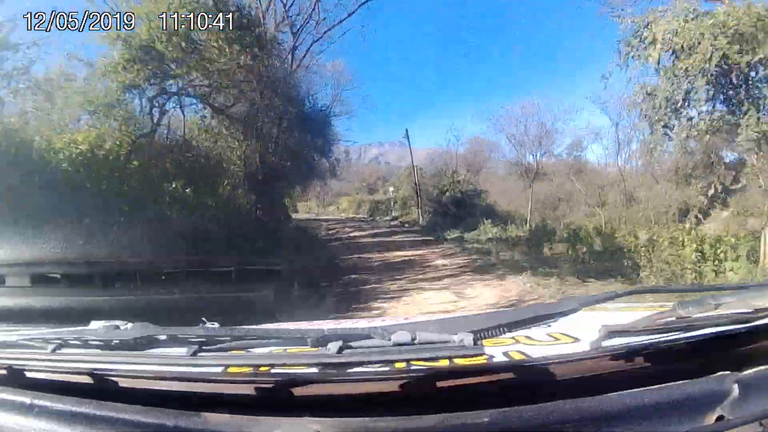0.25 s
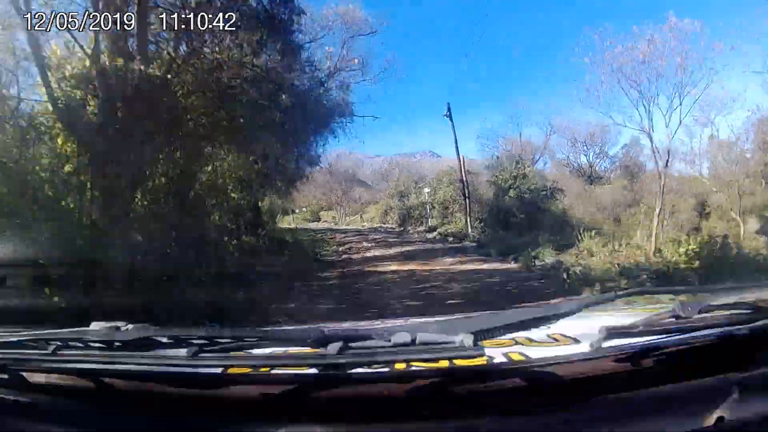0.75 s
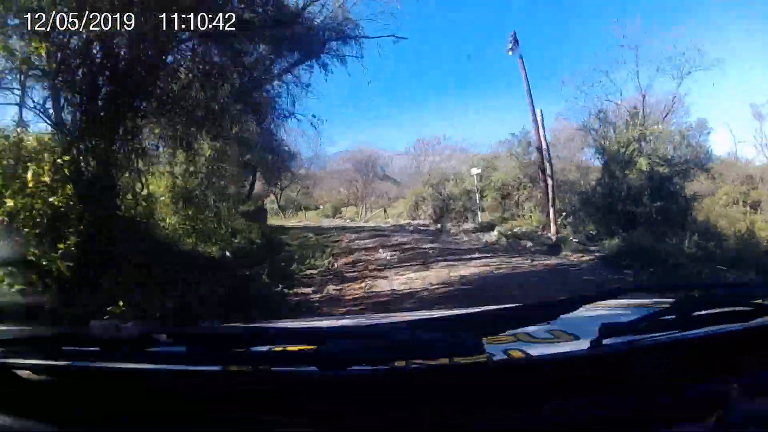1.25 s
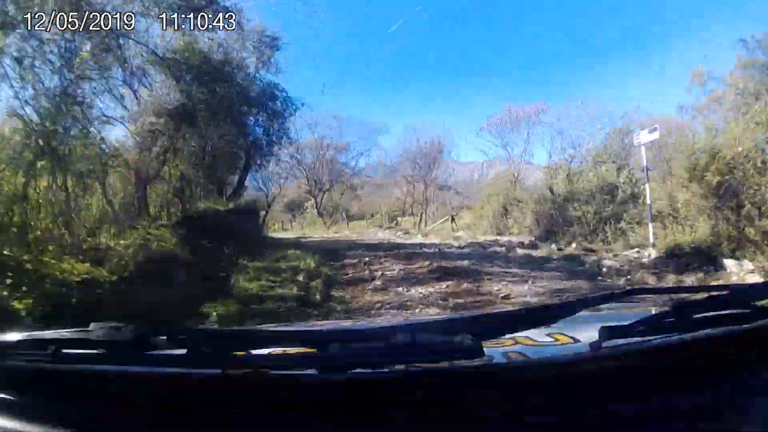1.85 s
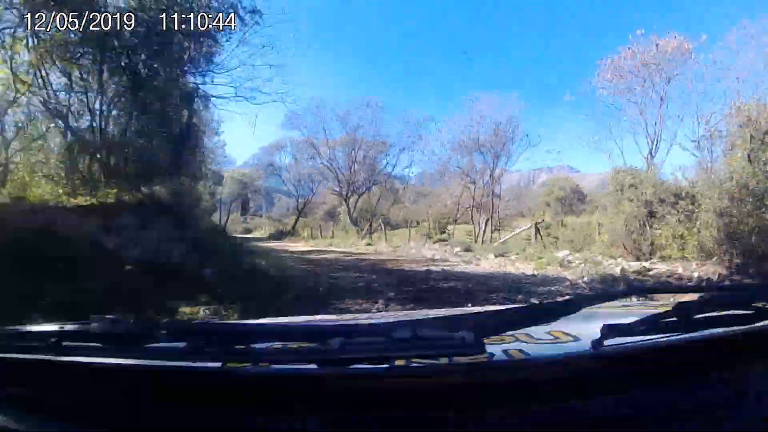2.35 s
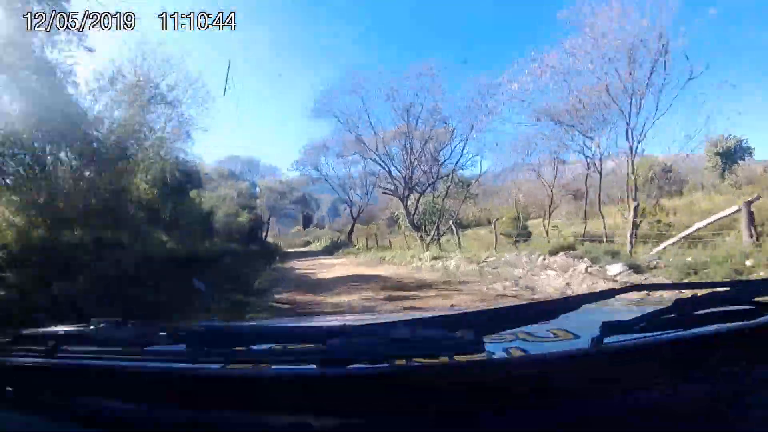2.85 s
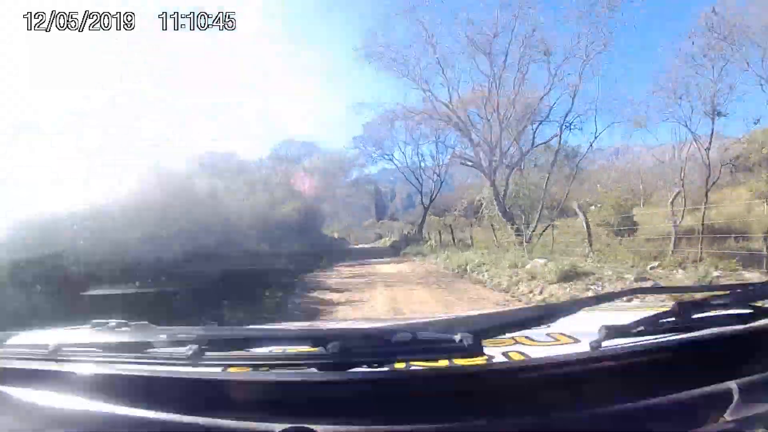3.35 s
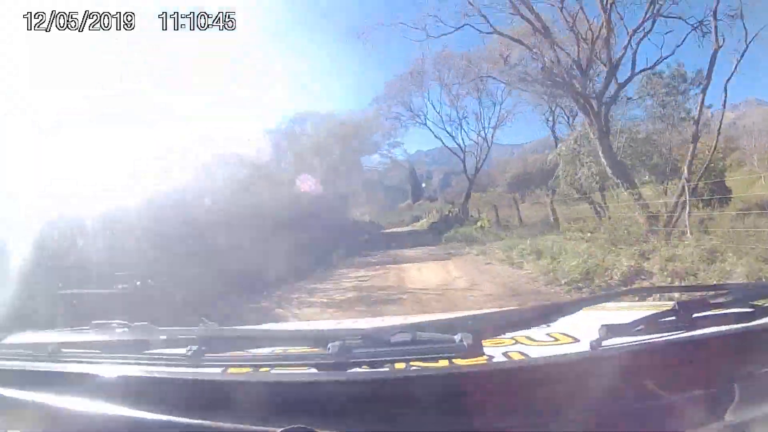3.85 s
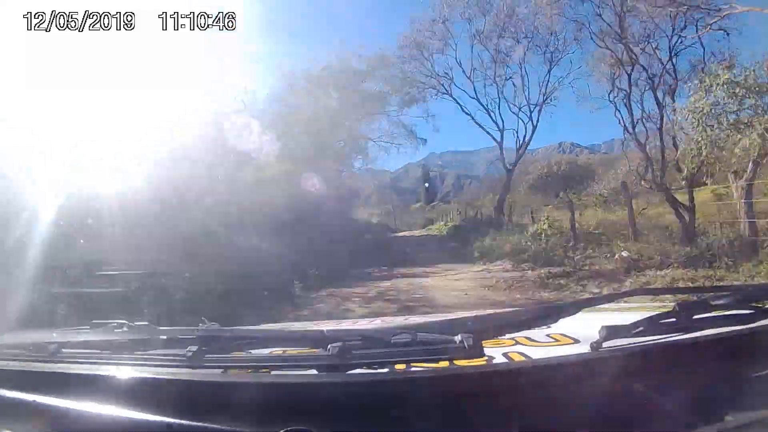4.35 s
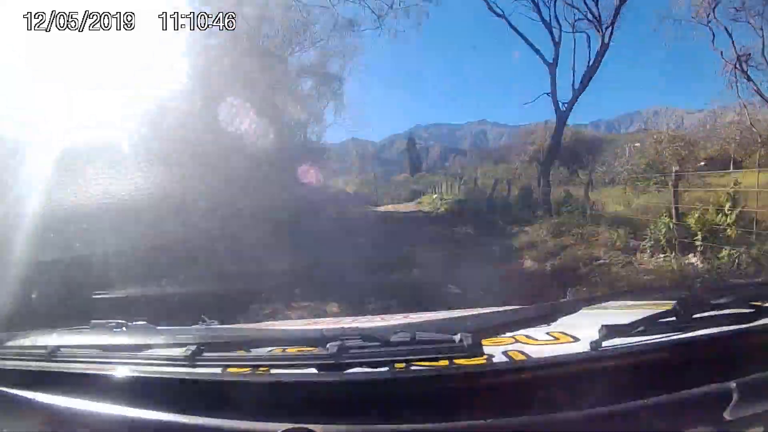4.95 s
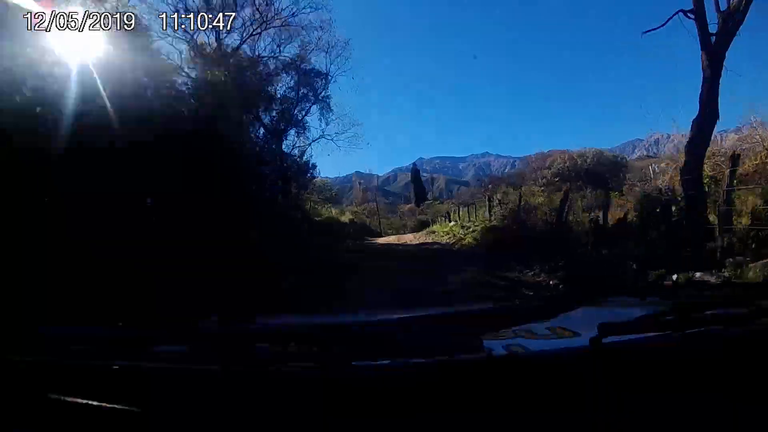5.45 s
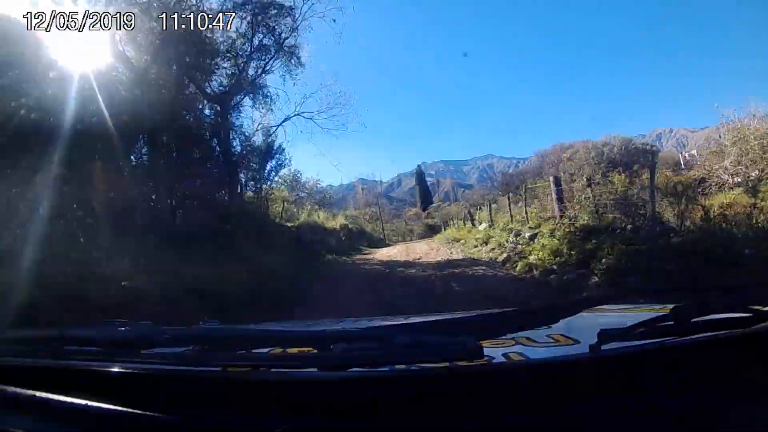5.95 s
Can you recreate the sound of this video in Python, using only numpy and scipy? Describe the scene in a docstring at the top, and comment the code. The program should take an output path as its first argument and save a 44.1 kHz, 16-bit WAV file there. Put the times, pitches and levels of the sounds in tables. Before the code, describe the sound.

Inside a car on a rough dirt road: steady engine hum, tyre hiss and grit, small ticking rattles, and two bursts of clattering stone hits.

```python
"""Rally car cabin on a dirt road

The engine drones at a wavering pitch (sine orders); bumps thud and make the cabin boom (shaped noise).
Gravel sprays the underbody; on two rough stretches stones bang on the panels (ringing modes plus noise cracks)
and loose fittings chatter at the turning points of the shaking. A small loose part ticks all along, grit
scrapes on metal (narrowband tones) and a panel buzzes briefly at about twice the firing rate (harmonics)."""
import sys
import numpy as np
from scipy import signal
from scipy.fft import rfft, irfft, next_fast_len
from scipy.io import wavfile
from scipy.ndimage import uniform_filter1d, map_coordinates

SR = 44100
rng = np.random.default_rng(int(sys.argv[2]) if len(sys.argv) > 2 else 0)


def int16_out(signal):
    """Quantize to a 16-bit WAV file."""
    q = np.round(np.clip(np.atleast_2d(signal).T, -1, 1) * 32767)
    wavfile.write(sys.argv[1], SR, q.astype(np.int16))


N = 273861

# road roughness over a smooth stretch: t/s, roughness/dB
ROAD_ROUGHNESS = [(0, 1), (.9, -2), (1.45, 1.5), (1.8, 2.5), (2.0, 6.5), (2.35, 5), (2.8, 7), (3.2, 2.5),
                  (3.6, 3.5), (4.0, 1), (4.5, 0), (4.97, 1.5), (5.22, 6.5), (5.5, 5.5), (5.82, 0.5),
                  (6.21, 4)]
# big stones on the body: t/s, level over first 3 ms/dB, contact spectrum peak f/Hz, knock strength/dB
BIG_STONES = [(0.1759, -34, 1570, -55.5), (0.3768, -29, 1660, -57), (0.459, -38, 1940, -61),
              (0.559, -35, 1800, -54), (0.813, -37, 1380, -39), (1.077, -28, 1410, -36),
              (1.086, -36, 1570, -32), (1.1707, -36, 1500, -51), (1.2833, -41.5, 1640, -49),
              (1.7054, -18.5, 1570, -37), (1.7101, -19, 1520, -52), (1.749, -20.5, 1900, -42),
              (1.753, -17, 1630, -29.5), (1.7973, -26.5, 1580, -36), (1.9109, -22, 1470, -30),
              (1.917, -22.5, 1310, -34), (1.928, -20, 1510, -51), (1.9672, -24, 1430, -33.5),
              (2.09, -22, 1470, -31.5), (2.096, -21, 1530, -42), (2.1538, -21, 1510, -24.5),
              (2.194, -25, 1625, -33), (2.2191, -22, 1690, -29), (2.306, -31, 1550, -35),
              (2.4324, -24.5, 1480, -34), (2.563, -20.5, 1680, -43), (2.6062, -14, 1800, -40.5),
              (2.611, -16, 1600, -38), (2.77, -19.5, 1480, -32.5), (2.7794, -25, 1490, -37),
              (2.785, -25, 1570, -47), (2.8038, -32, 1530, -36), (3.1749, -24.5, 1670, -28.5),
              (3.7532, -28, 1640, -59), (3.923, -30.5, 1550, -46), (5.058, -23, 1870, -44),
              (5.0812, -24, 1830, -50), (5.1293, -31.5, 1340, -29.5), (5.1902, -14.5, 2100, -34),
              (5.1949, -15.5, 1560, -28), (5.204, -18, 1410, -36), (5.2709, -14, 1690, -36.5),
              (5.316, -26.5, 1260, -44), (5.325, -17, 1710, -47), (5.4915, -24.5, 1680, -33),
              (5.4964, -18, 1860, -37), (5.634, -25, 1560, -27.5), (5.807, -30, 1550, -52),
              (5.9236, -26, 1290, -35), (5.9739, -26.5, 1510, -31.5), (6.028, -26.5, 1500, -30),
              (6.1828, -26, 1550, -31)]


def amp(db):
    """Decibels to gain."""
    return np.exp(np.asarray(db) * (np.log(10) / 20))


def unit(x):
    """Scaled to rms 1."""
    return x / np.sqrt(np.mean(x ** 2) + 1e-20)


def struck(sound):
    """A blow scaled to rms 1 over its first 3 ms."""
    return sound / np.sqrt(np.mean(sound[:SR // 300] ** 2) + 1e-20)


def along(points, hz):
    """(Hz, value) points interpolated on a log frequency axis."""
    f, v = np.transpose(points)
    return np.interp(np.log(hz + 1), np.log(f + 1), v)


def curves(rows):
    """One value per sample for each column after the time."""
    s, *cols = np.transpose(rows)
    return [np.interp(np.arange(N) / SR, s, c) for c in cols]


def wobble(rate):
    """A smooth random curve, rate knots a second."""
    coarse = np.arange(0, N + 32, 32)
    knots = rng.standard_normal(int(N * rate / SR) + 4)
    return np.interp(np.arange(N), coarse, map_coordinates(knots, [coarse * rate / SR]))


def colour(x, spectrum):
    """x through a causal minimum-phase filter with the given (Hz, dB) shape."""
    m = 2 * next_fast_len(len(x) // 2 + 600, real=True)
    log_gain = along(spectrum, np.fft.rfftfreq(m, 1 / SR)) * np.log(10) / 20
    # folding the cepstrum onto positive times makes the filter causal
    cepstrum = irfft(log_gain, m)
    cepstrum[1:m // 2] *= 2
    cepstrum[m // 2 + 1:] = 0
    return irfft(rfft(x, m) * np.exp(rfft(cepstrum)), m)[:len(x)]


def fade(t, t60):
    """Exponential decay, 60 dB down at t60."""
    return np.exp(-np.log(1000) * t / t60)


def ring(modes, t, scatter_db):
    """Decaying modes struck at a random spot, so with new strengths and signs."""
    hz, db, t60 = np.transpose(modes)[:, :, None]
    gain = amp(db + scatter_db * rng.standard_normal(hz.shape)) * rng.choice([-1, 1], hz.shape)
    return np.sum(gain * np.sin(2 * np.pi * hz * t) * fade(t, t60), axis=0)


def add(track, s, sound):
    """Mix a sound in at s seconds."""
    part = track[max(round(s * SR), 0):][:len(sound)]
    part += sound[:len(part)]


def swells(rows, attack_s, release_s):
    """Summed gain of (s, length s, dB) events: linear rise, exponential decay from length s after onset."""
    t = np.arange(N) / SR
    coarse = t[::32]
    gain = 0
    for s, length_s, db in rows:
        rise = np.clip((coarse - s) / attack_s, 0, 1)
        decay = np.exp(-np.maximum(coarse - s - length_s, 0) / release_s)
        gain = gain + amp(db) * rise * decay
    return np.interp(t, coarse, gain)


def patter(rate, spread_db):
    """Random tiny impacts of uneven size, rate a second, rms 1."""
    hits = rng.random(N) < rate / SR
    return unit(hits * rng.choice([-1, 1], N) * amp(spread_db * rng.standard_normal(N)))


def rumble(spectrum, evenness):
    """Low noise of rms 1 whose slow swells are partly evened out."""
    noise = unit(colour(rng.standard_normal(N), spectrum))
    power = np.abs(uniform_filter1d(noise ** 2, size=3000)) + 1e-6
    return unit(noise / power ** (evenness / 2))


def on_road(smooth_db, grows):
    """Gain of a layer: smooth_db on a smooth road, plus grows dB per dB of roughness."""
    return amp(smooth_db + grows * curves(ROAD_ROUGHNESS)[0])


def scattered(rate):
    """Random moments, rate a second, and the road's roughness at each."""
    count = int(N / SR * rate)
    times = np.abs(np.arange(count) + rng.uniform(-1, 2, count)) / rate
    return times, np.interp(times, *np.transpose(ROAD_ROUGHNESS))


def bumps():
    """Wheels cross ruts and rocks: gain curves for shaking the fittings and for suspension thuds."""
    # t/s, onset to release/s, chatter drive/dB, thud level/dB
    ruts = [(0.137, .025, -56, -39.5), (0.801, .03, -55, -42), (1.061, 0.032, -44.5, -40),
            (1.51, .11, -49, -41.5), (1.697, 0.053, -43.5, -36.5), (1.864, .115, -34, -35.5),
            (2.022, .16, -36, -36), (2.198, .12, -41, -38.5), (2.483, 0.044, -33, -43.5),
            (2.565, .08, -33, -45), (2.673, .06, -35.5, -38), (2.737, 0.078, -31.5, -46),
            (2.86, .05, -33.5, -46), (2.964, .025, -34, -41), (3.013, .05, -33.5, -48.5),
            (3.17, 0.013, -38.5, -34.5), (3.321, .06, -40.5, -47), (4.174, .05, -49.5, -41.5),
            (4.527, .06, -58.5, -41), (4.746, .03, -58.5, -39.5), (4.851, .02, -51, -41.5),
            (5.032, .04, -33, -36), (5.124, .145, -30, -34), (5.295, .13, -45.5, -45),
            (5.462, .09, -37, -45), (5.624, 0.065, -42.5, -33.5), (5.945, 0.044, -48, -40),
            (6.17, 0.02, -38, -35.5)]
    s, length_s, chatter_db, thud_db = np.transpose(ruts)
    return [swells(zip(s, length_s, db), attack_s=0.0084, release_s=.016) for db in (chatter_db, thud_db)]


def engine(jolt):
    """The firing tone booms in the cabin; its overtones and half orders are weak."""
    # firing rate: t/s, f/Hz
    firing_rate = [(0, 160), (.13, 154.5), (.48, 154), (.72, 150.5), (1.38, 147), (1.65, 163), (1.85, 152),
                   (2.25, 145), (2.7, 149), (3, 159), (3.22, 151), (3.38, 159), (3.75, 146), (4.2, 141),
                   (4.6, 134), (5.0, 166), (5.3, 151), (5.45, 155), (5.85, 134), (6.21, 141)]
    # drone: t/s, drive/dB
    drone_drive = [(0, -34.5), (.4, -32.5), (.88, -32.5), (1.35, -44), (1.55, -35), (2.2, -36.5),
                   (3.1, -38), (3.7, -38.5), (4.55, -43), (5.45, -37.5), (5.72, -42.5), (6.0, -36.5),
                   (6.21, -37)]
    # cabin swells of the firing tone: t/s, onset to release/s, drive/dB
    surges = [(.96, 0.011, -36), (1.04, .03, -37), (3.3, 0.17, -30), (3.655, .035, -37.5),
              (4.115, 0.064, -30.5), (4.895, .125, -29.5), (5.305, 0.058, -29.5)]
    hz = curves(firing_rate)[0]
    level = amp(curves(drone_drive)[0])
    swell = np.hypot(level, swells(surges, attack_s=0.04, release_s=.04))
    jerk = 1 - np.exp(-amp(40) * jolt)  # on rough ground the wheels jerk the engine about
    jitter = (.002 + .07 * jerk ** 2) * wobble(30)
    phase = 2 * np.pi * np.cumsum(hz * (1 + jitter)) / SR
    orders = [.5, 1.5, 2, 2.5, 3, 4, 6]  # multiples of the firing rate
    order_db = [-25.0, -19.0, -14.0, -26.5, -24.0, -41.5, -31]
    overtones = sum(amp(db + 2.6 * wobble(3)) * np.sin(k * phase) for k, db in zip(orders, order_db))
    firing = amp(-1.5) * swell * np.sin(phase)
    return np.sqrt(2) * (firing + level * overtones) * amp(.6 * wobble(45))


def cabin(jolt, thump):
    """Bumps thud through the suspension, set the shell booming and heave the whole car."""
    # thud spectrum: f/Hz, rel. level/dB
    thud_shape = [(11, -43), (18, -11.5), (64, -4), (125, 2.5), (160, -33.5), (280, -120)]
    # shell boom spectrum: f/Hz, rel. level/dB
    boom_shape = [(85, -30), (110, -11), (140, -3.5), (180, 2), (222, 0.5), (262, -7.5), (305, -6),
                  (350, -12.5), (410, -13.5), (505, -14.5), (570, -28.5), (750, -49), (1500, -81.5)]
    heave_shape = [(12, -27.5), (28, -3.5), (50, -4.5), (90, -3.5), (125, -19.0), (300, -78)]
    heave = amp(-11.0) * jolt * rumble(heave_shape, evenness=0.69)
    thud = np.hypot(on_road(smooth_db=-46.5, grows=1.15), thump) * rumble(thud_shape, evenness=0.69)
    boom_gain = np.hypot(on_road(smooth_db=-37.5, grows=0.87), amp(-1) * jolt)
    boom = boom_gain * rumble(boom_shape, evenness=0.69)
    return heave + thud + boom


def gravel():
    """Tyre hiss with a dense spray of small grit on the wheel wells, and fine sand on the sills."""
    # wheel well spectrum: f/Hz, rel. level/dB
    well_shape = [(350, -27.5), (550, -32.5), (740, -5.5), (880, 7.5), (1300, 5.5), (1520, 4.5),
                  (1650, -5.5), (1860, 8), (2080, -1), (2800, -8.5), (3150, -10), (3900, -22), (5000, -44),
                  (5700, -65.5)]
    # sill spectrum: f/Hz, rel. level/dB
    sill_shape = [(1200, -31), (2300, 4), (2750, -4.5), (3200, 1.5), (3800, -11), (4900, -17),
                  (5400, -32.5), (6000, -59), (8300, -53.5), (14000, -48.5)]
    # sheets of thrown sand: t/s, onset to release/s, nominal level/dB
    sheets = [(2.2, 0.051, -55), (2.72, 0.082, -38.5), (2.875, .035, -41), (3.01, 0.024, -45.5),
              (3.3, 0.29, -51), (5.25, 0.24, -48.5)]
    spray_gain = on_road(smooth_db=-44.5, grows=1) * amp(1.4 * wobble(22))
    grains = patter(rate=500, spread_db=5)
    grit = amp(-4.5) * unit(colour(grains, well_shape))
    flickering_noise = rng.standard_normal(N) * amp(3.3 * wobble(70))
    hiss = amp(-6) * unit(colour(flickering_noise, well_shape))
    sand = unit(colour(patter(rate=1500, spread_db=5.0), sill_shape))
    thrown = swells(sheets, attack_s=0.014, release_s=0.036)
    sand_gain = np.hypot(on_road(smooth_db=-63, grows=0.78), thrown)
    return spray_gain * (grit + hiss) + sand_gain * sand


def scrapes():
    """Grit on metal: friction excites one narrow resonance for a moment."""
    # t/s, length/s, f/Hz, level before the treble cut/dB
    strokes = [(2.875, .04, 3200, -40), (3.012, 0.026, 3280, -42.5), (3.144, 0.013, 3250, -44),
               (3.347, 0.015, 1950, -29.5)]
    width_hz = 140
    track, t = np.zeros(N), np.arange(SR // 10) / SR
    for s, length_s, hz, db in strokes:
        # random-walk phase broadens the tone to a narrow band
        drift = np.cumsum(rng.standard_normal(len(t))) * np.sqrt(2 * np.pi * width_hz / SR)
        phase = 2 * np.pi * hz * t + drift
        stroke = np.abs(np.sin(np.pi * np.clip(t / length_s, 0, 1))) ** .5
        add(track, s, amp(db) * np.sqrt(2) * stroke * np.sin(phase))
    return colour(track, [(3600, 0), (5600, -35)])


def panel_buzz():
    """A panel buzzes briefly at about twice the firing rate: harmonics shaped by its response."""
    # t/s, buzz rate f/Hz, level/dB
    buzz_rows = [(2.2, 282, -74), (2.225, 291, -39), (2.26, 300.6, -43), (2.29, 295.3, -42.5),
                 (2.32, 287, -44), (2.36, 291, -78.5)]
    # panel response: f/Hz, rel. level/dB
    panel_shape = [(1200, -19), (1780, -1), (2350, -5), (2670, -10.5), (2970, 1.5), (3300, -13),
                   (3570, -10), (4000, -32)]
    hz, db = curves(buzz_rows)
    phase = 2 * np.pi * np.cumsum(hz * (1 + 0.0014 * wobble(100))) / SR
    tone = 0
    for k in np.arange(4, 14):
        gain = amp(along(panel_shape, k * hz.mean()))
        tone = tone + gain * np.sin(k * phase + rng.uniform(0, 2 * np.pi))
    # silent from the last row on; very faint before the first
    return amp(db) * unit(tone) * (db > db.min())


def ticks():
    """A small hard part hops on its seat and bounces once: each contact is a tap and a thin, short ring."""
    # hops at set times: t/s, strength/dB
    set_hops = [(0.0159, -44.5), (0.1114, -42), (0.16, -42), (0.2294, -42.5), (0.3666, -45.5),
                (0.605, -45.5), (0.7402, -43.5), (0.7921, -45), (0.9916, -49.5), (1.1059, -42.5),
                (1.1199, -43), (1.2725, -43.5), (1.3872, -42), (2.4493, -39), (2.4927, -42), (3.3199, -43),
                (3.5114, -35.5), (3.6366, -44), (3.7244, -41), (3.9434, -41.5), (4.1011, -39),
                (4.1385, -45.5), (4.2308, -47), (4.572, -53), (4.7511, -46.5), (4.8184, -52), (5.7803, -43),
                (6.0132, -40)]
    # modes of the loose part: f/Hz, rel. level/dB, t60/s
    part_modes = [(2580, 5.5, 0.026), (3080, 5.5, 0.013), (3500, 0.5, .03), (3770, 1, 0.03),
                  (3960, -7.5, 0.017), (4240, 0.5, 0.02), (4357, -4, 0.035), (4830, -20, 0.028)]
    # tap spectrum: f/Hz, gain/dB
    tap_shape = [(500, -26), (700, -22.5), (900, -1.5), (1350, 1.5), (1650, -11), (1900, 9), (2400, 0.5),
                 (3300, -6.5), (4400, -10), (4650, -30), (4900, -22), (5600, -59)]
    # hops at random times
    random_hops_per_s, random_hop_db, spread_db = 18, -49, 1
    typical_bounce_s, bounce_loss_db = .016, 12
    ring_db, tap_db = -5, 11  # over the hop strength
    tones, taps, t = np.zeros(N), np.zeros(N), np.arange(SR // 40) / SR
    random_hops = [(s, random_hop_db + spread_db * np.clip(rng.standard_normal(), -2, 2))
                   for s in scattered(random_hops_per_s)[0]]
    hops = list(set_hops) + random_hops
    bounces = [(s + typical_bounce_s * 2 ** rng.uniform(-.5, 1), db - bounce_loss_db) for s, db in hops]
    for s, db in hops + bounces:
        tone = ring(part_modes, t, scatter_db=3) * (1 - fade(t, .003))
        add(tones, s, amp(db + ring_db) * struck(tone))
        tap = rng.standard_normal(len(t)) * fade(t, .007)
        add(taps, s, amp(db + tap_db) * struck(tap))
    return colour(tones, [(4900, -1), (5800, -25)]) + colour(taps, tap_shape)


def chatter(shaking, jolt):
    """Loose fittings strike their stops at each swing of the shell, harder on wide swings."""
    # fittings spectrum: f/Hz, rel. level/dB
    fittings_shape = [(200, -31.5), (420, -2), (700, 0), (1050, -4.5), (1370, 3.5), (1650, -2),
                      (1880, -3.5), (2450, -8), (3100, -9.5), (3900, -21.5), (5200, -41), (5900, -62),
                      (8300, -72.5), (11500, -57)]
    shake = unit(shaking)
    swing = shake / np.sqrt(np.abs(uniform_filter1d(shake ** 2, size=2500)) + 1e-6)
    smooth = uniform_filter1d(swing, size=60)
    turns = np.diff(np.sign(np.gradient(smooth)), prepend=0) != 0
    blows = turns * smooth * amp(2.0 * rng.standard_normal(N))
    # after each blow the part buzzes on its stop for a few milliseconds
    decay = fade(np.arange(SR // 50) / SR, .011)
    buzz = signal.fftconvolve(np.abs(blows), decay)[:N] * rng.standard_normal(N)
    rattle = unit(blows) + .9 * unit(buzz)
    return amp(-0.27) * jolt * unit(colour(rattle, fittings_shape))


def glances():
    """Rows like BIG_STONES for the weaker graze before and rebound after each big stone."""
    contacts = [(-0.0082, -21.5), (.011, -23.5)]  # typical lag/s, rel. level/dB
    return [(s + lag_s * 2 ** rng.uniform(-.5, .5), db + drop_db, hz, knock_db + drop_db)
            for s, db, hz, knock_db in BIG_STONES for lag_s, drop_db in contacts]


def pebbles():
    """Rows like BIG_STONES for the small stones that the tyres flick up, harder on a rough road."""
    times, rough_db = scattered(rate=8)
    size, pitch = np.clip(rng.standard_normal((len(times), 2)), -2, 2).T
    smooth_db, grows, spread_db = -39, 2.1, 2
    db = smooth_db + grows * rough_db + spread_db * size
    median_hz, knock_rel_db = 1620, -14.5
    return list(zip(times, db, median_hz * np.exp(.12 * pitch), db + knock_rel_db))


def stones():
    """Each stone cracks on a panel, which rings briefly, and knocks on the floor pan."""
    # underbody panel modes: f/Hz, rel. level/dB, t60/s
    panel_modes = [(556, -1, 0.024), (840, 2.5, 0.0068), (1060, -11.5, 0.091), (1315, 6, 0.016),
                   (1505, -2, 0.026), (1805, 5, 0.014), (2077, -3.5, 0.031), (2516, 1.5, 0.01),
                   (3010, -9, 0.042), (3970, -15, 0.013)]
    # floor pan modes: f/Hz, rel. level/dB, t60/s
    floor_modes = [(389.6, 0.5, 0.038), (534, 7.5, 0.024), (670, -2, 0.025)]
    # crack spectrum: f/Hz, rel. level/dB
    crack_shape = [(200, -26.5), (600, 1.5), (1300, 5.5), (2400, 5.5), (3300, -6), (4000, -18), (4900, -26),
                   (5700, -49.5), (7000, -48.5), (8300, -69.5), (10000, -43.5), (15000, -57.5)]
    track, t = np.zeros(N), np.arange(SR // 36) / SR
    for s, db, hz, knock_db in list(BIG_STONES) + glances() + pebbles():
        contact = [(hz / 4, -14), (hz / 2, -6), (hz, 0), (hz * 2, -8), (4000, -11), (5600, -36), (9000, -33)]
        body = colour(ring(panel_modes, t, scatter_db=3.5), contact)
        crack = colour(rng.standard_normal(len(t)) * fade(t, 0.0094), crack_shape)
        hardness = amp(0.97 * (db + 20.5))  # strong blows crack, weak ones mostly ring
        blow = struck(struck(body) + 0.76 * hardness * struck(crack))
        knock = ring(floor_modes, t, scatter_db=2.0) * (1 - fade(t, 0.0059))
        add(track, s, amp(db) * blow + amp(knock_db - 1.0) * struck(knock))
    return track


def scene():
    """Sum of all layers, one channel; engine and cabin shaking drive the chatter."""
    rattle, thump = bumps()
    jolt = np.hypot(on_road(smooth_db=-59, grows=2.2), rattle)
    shaking = engine(jolt) + cabin(jolt, thump)
    mix = shaking + gravel() + chatter(shaking, jolt) + stones() + ticks() + panel_buzz() + scrapes()
    return mix[None]


def record(dry):
    """Adds a faint hiss and removes everything above the band limit."""
    top_hz = 15750
    hiss_shape = [(8500, -19.0), (11000, -3.5), (13000, -3.5), (15700, -11.5)]
    hiss = amp(-89.0) * unit(colour(rng.standard_normal(N), hiss_shape))
    m = next_fast_len(N + SR // 2)
    in_band = np.fft.rfftfreq(m, 1 / SR) < top_hz
    return irfft(rfft(dry + hiss, m) * in_band, m)[..., :N]


dry = scene()
out = record(dry)
int16_out(out)
```